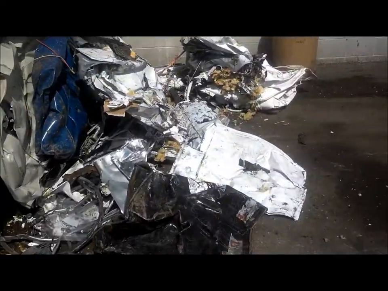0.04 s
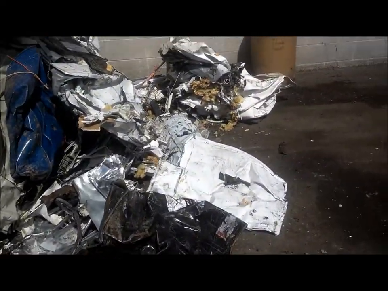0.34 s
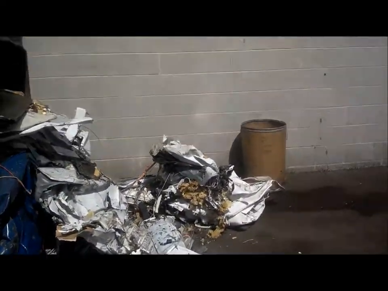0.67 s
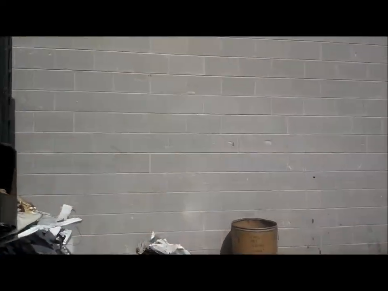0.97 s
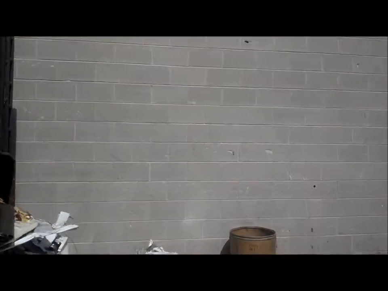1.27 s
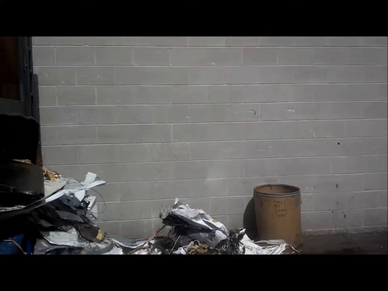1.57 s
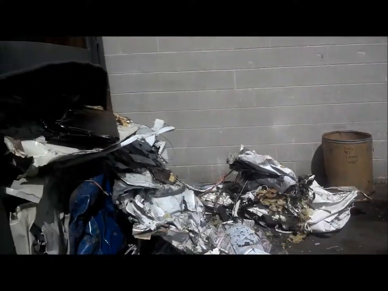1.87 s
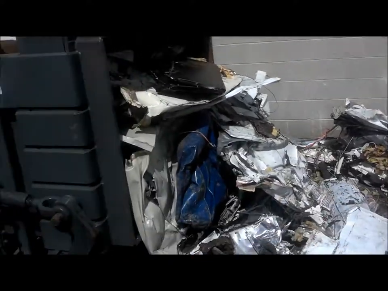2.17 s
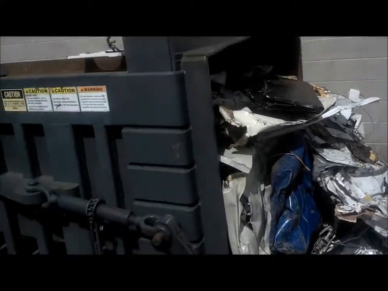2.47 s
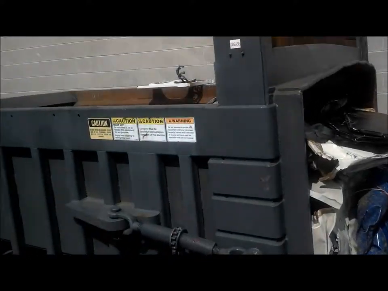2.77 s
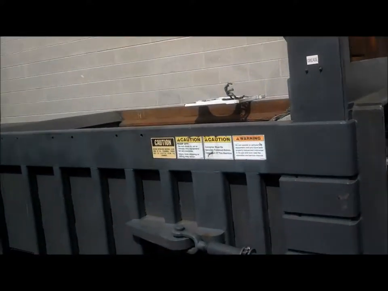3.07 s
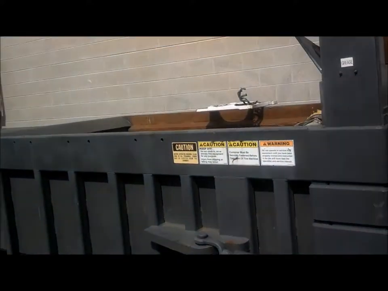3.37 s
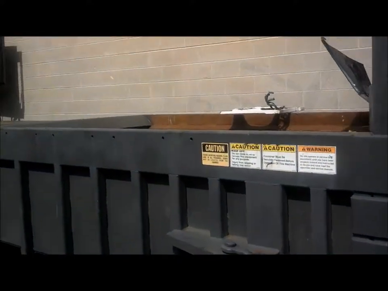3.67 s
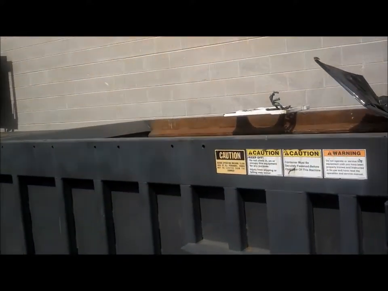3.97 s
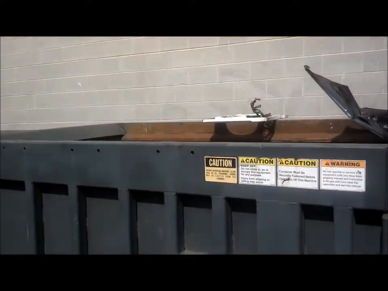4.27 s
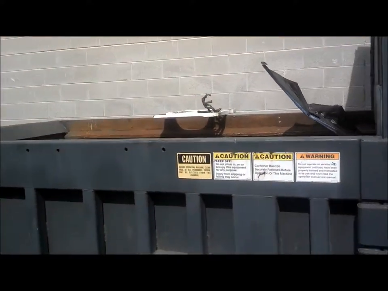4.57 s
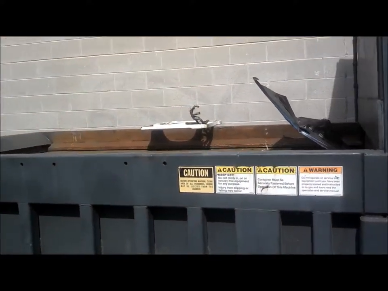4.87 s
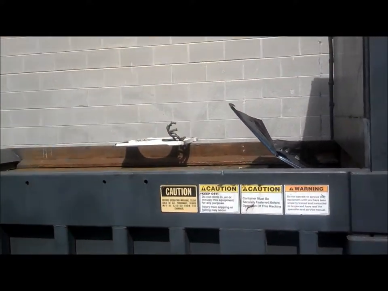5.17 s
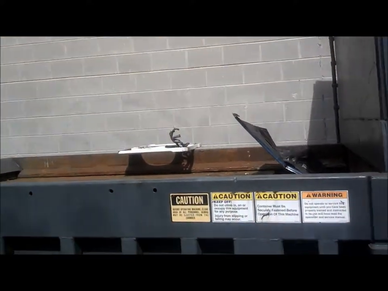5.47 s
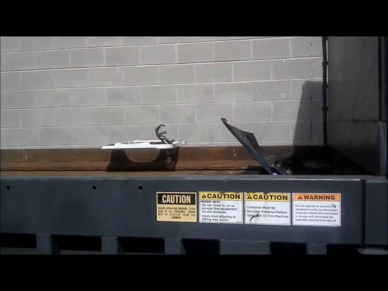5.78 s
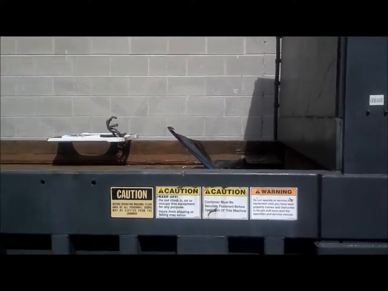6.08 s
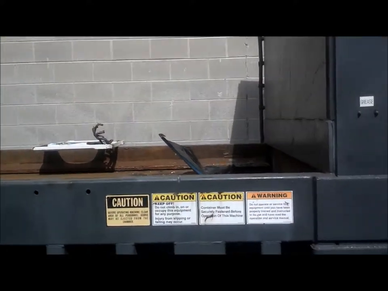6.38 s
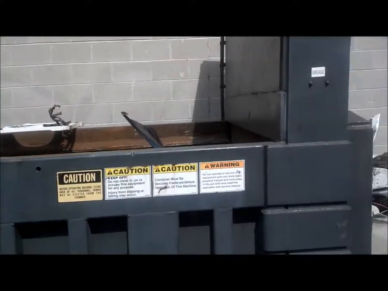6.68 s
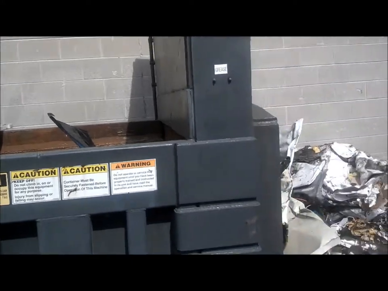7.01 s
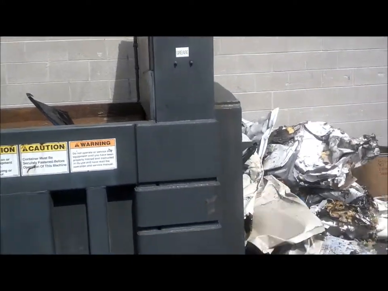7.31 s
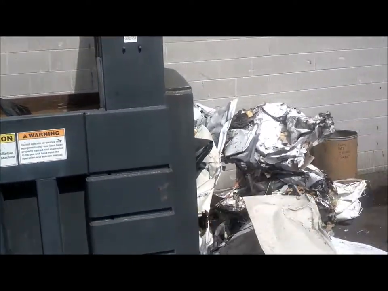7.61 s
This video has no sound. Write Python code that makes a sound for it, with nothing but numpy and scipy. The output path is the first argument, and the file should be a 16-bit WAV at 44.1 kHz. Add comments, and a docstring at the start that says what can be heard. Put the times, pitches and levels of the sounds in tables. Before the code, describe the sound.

A hydraulic compactor hums and whines while sheet metal scrap crunches, scrapes and snaps as it is pushed out.

```python
"""Hydraulic scrap compactor in a walled yard.

Sheet scrap buckles, scrapes and snaps as a ram pushes it out of a steel chamber.
A piston pump hums and whines over rushing oil and the rumbling body; this drone drops suddenly at
loud crunches and snaps, then swells back steadily. Heard through two close, moving microphone ports."""
import sys
import numpy as np
from scipy import signal
from scipy.fft import rfft, irfft, next_fast_len
from scipy.io import wavfile
from scipy.ndimage import uniform_filter1d, map_coordinates

SR = 44100
rng = np.random.default_rng(int(sys.argv[2]) if len(sys.argv) > 2 else 0)


def unload_audio(sound):
    """Save the sound as a 16-bit wav file, at the path given as the first command line argument."""
    columns = np.transpose(np.atleast_2d(sound))
    # keep every value between -1 and 1, then stretch to whole-number steps
    steps = np.round(np.clip(columns, -1, 1) * 32767)
    wavfile.write(sys.argv[1], SR, steps.astype(np.int16))


N = 346185
BURST_SAMPLES = 32768
BURST_HZ = np.fft.rfftfreq(BURST_SAMPLES, 1 / SR)

# load of shoving the bale, over easy running: time_s, strain_db
RAM_STRAIN = [(0, 12.5), (.3, 8), (.44, 4), (.6, 12.5), (.98, 8), (1.28, 14.5), (1.6, 2.5), (2.4, 1),
              (3.3, -0.5), (4.05, 1.5), (5.1, -1), (5.35, 0), (5.8, -5.5), (6.1, 4.5), (6.55, 0),
              (7.3, -0.5), (7.5, 2), (7.85, 3.5)]
# machine's bearing as bass balance: time_s, left_over_right_db
BEARING = [(0, 2), (.7, 5.5), (2.2, 7), (3.2, 0.5), (4.7, 0), (5.7, 1), (7.85, 0.5)]


def buckling():
    """Each fold thuds in the chamber, crunches at its piece's resonance and crackles at the edges."""
    # start_s, length_s, level_db, bright_db, weight_db, resonance_hz
    folds = [(0.0, 0.028, -22.5, 1, 7, 1010), (0.138, 0.03, -31.5, 3.5, 17, 700),
             (0.201, 0.096, -26, -3.5, 7.5, 603), (0.466, 0.044, -16.5, -5.5, -4, 710),
             (0.592, 0.018, -15, -15, -7, 746), (0.616, 0.036, -16, -2, 0, 726),
             (.773, 0.01, -14.5, -1.5, -17, 740), (0.784, 0.0059, -16.5, 2, -7, 700),
             (0.799, 0.092, -20, -2, -21, 805), (0.887, 0.063, -15, -6.5, -2, 670),
             (1.143, 0.013, -21, 0, 5, 700), (1.155, 0.041, -20.5, -1, 3.5, 875),
             (1.243, 0.09, -24, -9, -6, 695), (2.998, 0.0026, -14.5, -2.5, -3.5, 1900),
             (3.069, 0.021, -23.5, 3, -15, 2210), (3.694, 0.021, -19.5, 4.5, 2.5, 1730),
             (3.813, 0.084, -33, 1, 3, 796), (4.062, 0.016, -22.5, 9.5, -5, 790),
             (4.098, 0.013, -21, 6, -5, 680), (4.128, 0.014, -26, 7.5, 0, 1200),
             (4.177, 0.018, -25.5, 4.5, -7, 1000), (4.374, 0.015, -28, 13, 6, 796),
             (4.399, 0.074, -23.5, 4, -5, 670), (4.649, 0.014, -21.5, -9, -4, 1050),
             (4.698, 0.015, -29, -17, 10, 400), (5.214, 0.026, -23.5, 1.5, -4, 1190),
             (5.28, 0.056, -27.5, 0.5, 6, 1200), (5.373, 0.019, -25.5, -4, -2, 1090),
             (5.411, 0.027, -24, -9, 3, 550), (5.469, 0.06, -33, 1.5, -3, 1160),
             (5.577, 0.044, -27.5, 1.5, 6, 1500), (5.65, 0.067, -28, -16, -1, 850),
             (5.725, 0.023, -29, -13, 7, 900), (5.767, 0.018, -29, 2, -2, 800),
             (5.894, 0.023, -28.5, 2.5, 0, 880), (5.921, 0.01, -21.5, -7, 2, 700),
             (5.948, 0.013, -20, -1, 5, 1050), (5.976, .006, -26, -1, 0, 680),
             (6.071, 0.012, -31.5, 1, 3, 1290), (6.115, .007, -28, -8, 0, 1150),
             (6.152, 0.035, -34.5, -10, 13, 650), (6.664, 0.01, -26, -18, 5, 800),
             (6.764, 0.016, -32.5, -20, 4, 920), (6.82, 0.017, -30.5, -5, 1, 704),
             (6.968, 0.022, -31.5, -9, 11, 400), (7.089, 0.035, -31, -1.5, 7.5, 806),
             (7.162, 0.014, -31.5, -5, 11, 494), (7.293, .007, -24, -27, 7, 1100),
             (7.361, 0.012, -22, -0.5, -7, 1310), (7.382, 0.015, -19.5, -1.5, 3.5, 900),
             (7.417, 0.016, -22.5, 3, -13, 1300), (7.495, 0.014, -26.5, -2, -11, 910),
             (7.526, 0.0063, -25.5, -0.5, 9, 900), (7.621, 0.021, -22.5, -3, 0, 1400),
             (7.662, 0.0071, -24.5, 0, -10, 1400), (7.737, 0.048, -17.5, -2.5, 1.5, 1450),
             (7.75, 0.019, -25.5, -20, -10, 516), (7.803, 0.02, -19.5, 0, -5, 536)]
    # layer spectra: freq_hz, level_db
    thud_spectrum = [(25, -35), (60, -29), (100, -10), (160, 2.5), (330, 2.5), (520, 0), (900, -23.5),
                     (2500, -79.5)]
    crunch_spectrum = [(150, -51), (350, 3.5), (520, 3.5), (720, 2), (1050, 1), (1500, -0.5), (2000, -2.5),
                       (3000, -20), (7000, -63)]
    edge_spectrum = [(700, -47), (1500, -16), (2200, 6.5), (3300, 2.5), (4700, -2), (6000, -2), (7500, -13),
                     (10000, -13), (15500, -21)]
    thud, crunch, edge = map(minimum_phase, (thud_spectrum, crunch_spectrum, edge_spectrum))
    out = np.zeros((2, N))
    for start_s, length_s, level_db, bright_db, weight_db, centre_hz in folds + small_folds(count=16):
        body = 1 + amp(1.5) * resonance(BURST_HZ, centre_hz, width_hz=centre_hz / 1.8)
        layers = (weight_db - 8, thud), (0, crunch * body), (bright_db - 4, edge)
        force = stroke(length_s, rise_s=0.0007, t60_s=0.059 + 2.4 * length_s)
        run = cracks(force, rate_hz=2400, spread_db=2, ring_t60_s=0.034, ring_db=1.5, lead_gain=2.83)
        run *= sheet_modes(q=32, gain=0.71, count=9)
        add(out, start_s, sum(amp(level_db + db) * burst(run * colour, force) for db, colour in layers))
    return out


def small_folds(count):
    """Rows for faint folds at random times; their level follows the strain and the drone."""
    length_s, centre_hz, scatter_db = 0.013, 900, 3
    level_db = -30.5 + swell_db() + curves(RAM_STRAIN)[0] / 2
    return [(when * N / SR, length_s, level_db[int(when * N)] + scatter_db * (2 * size - 1),
             0, 0, centre_hz) for when, size in rng.random((count, 2))]


def scraping():
    """Sheets sliding on steel hiss with dense slips and rasp at their own resonance."""
    # start_s, length_s, rise_s, level_db, rasp_hz
    slides = [(0.84, 0.02, .01, -28.5, 4000), (1.022, 0.012, 0.0049, -31, 4300),
              (1.148, 0.052, 0.011, -27.5, 4200), (1.236, 0.049, .01, -37, 4200),
              (3.017, 0.027, 0.0067, -26.5, 2320), (3.185, 0.011, 0.0029, -26, 5900),
              (3.699, 0.052, 0.0028, -25, 14400), (3.795, 0.12, 0.014, -28, 6000),
              (4.167, 0.022, 0.0024, -27, 5950), (4.394, 0.045, 0.0034, -26, 5200),
              (6.515, 0.0069, 0.0011, -29, 3270), (6.536, 0.037, 0.002, -23, 1820),
              (6.548, 0.029, 0.0037, -23.5, 8100), (7.77, 0.057, 0.011, -33, 9500)]
    # freq_hz, level_db
    slide_spectrum = [(300, -16), (1000, -3.5), (1900, 0), (3500, 0.5), (5500, -3.5), (8000, -4.5),
                      (12000, -6.5), (15500, 3)]
    out, colour = np.zeros((2, N)), minimum_phase(slide_spectrum)
    for start_s, length_s, rise_s, level_db, rasp_hz in slides:
        force = stroke(length_s, rise_s, t60_s=0.14)
        rasp = 1 + amp(1) * resonance(BURST_HZ, rasp_hz, width_hz=rasp_hz / 3.5)
        slips = cracks(force, rate_hz=5000, spread_db=4, ring_t60_s=0.03, ring_db=4)
        add(out, start_s, amp(level_db) * burst(colour * rasp * slips, force))
    return out


def snapping():
    """Brittle pieces break: one bright crack, then milliseconds of splintering."""
    # start_s, length_s, level_db
    breaks = [(1.131, 0.005, -28), (2.033, 0.0025, -29), (2.996, 0.0016, -27.5), (3.076, .003, -30),
              (4.061, 0.0045, -21.5), (4.099, .003, -24), (4.33, 0.0019, -31), (4.371, .003, -34),
              (5.807, 0.0026, -21), (5.941, .003, -18), (6.517, .006, -22.5), (7.386, 0.0022, -19.5),
              (7.418, 0.0063, -17)]
    # freq_hz, level_db
    snap_spectrum = [(300, -30), (1000, -10), (2000, 7), (3500, -1.5), (6000, -1), (9000, -5),
                     (12000, -4.5), (15500, -0.5)]
    out, colour = np.zeros((2, N)), minimum_phase(snap_spectrum)
    for start_s, length_s, level_db in breaks:
        force = stroke(length_s, rise_s=0.0002, t60_s=0.02)
        snap = cracks(force, rate_hz=4000, spread_db=4, ring_t60_s=0.06, ring_db=-6, lead_gain=5)
        add(out, start_s, amp(level_db) * burst(colour * snap, force))
    return out


def squeak(start_s, pitch_hz, level_db):
    """An edge sticks and slips: a brief rough tone with its octave."""
    out = np.zeros((2, N))
    jitter = 0.035 * np.array([wobble(650, size=BURST_SAMPLES) for _ in range(2)])
    phase = 2 * np.pi * np.cumsum(pitch_hz * (1 + jitter), axis=1) / SR
    tone = unit(np.sin(phase) + 1.1 * np.sin(2 * phase))
    add(out, start_s, amp(level_db) * stroke(0.011, rise_s=0.0016, t60_s=0.16) * tone)
    return out


def ram_knocks():
    """The ram lurches against the box: quick, dull blows on thick steel."""
    # start_s, length_s, level_db
    knocks = [(2.13, 0.016, -22), (2.15, 0.022, -18), (2.181, 0.012, -23.5)]
    # centre_hz, width_hz, level_db
    steel_modes = [(122, 30, 0), (160, 35, 1), (208, 35, 1), (257, 40, 1), (387, 50, 0), (456, 45, -2),
                   (507, 45, -3), (612, 50, -3), (717, 60, -4), (940, 160, -13), (1615, 60, -12)]
    steel = sum((-1) ** k * amp(db) * resonance(BURST_HZ, centre_hz, width_hz)
                for k, (centre_hz, width_hz, db) in enumerate(steel_modes))
    out = np.zeros((2, N))
    for start_s, length_s, level_db in knocks:
        force = stroke(length_s, rise_s=0.0011, t60_s=0.11)
        grind = cracks(force, rate_hz=2000, spread_db=3, ring_t60_s=0.05, ring_db=-4, lead_gain=5)
        add(out, start_s, amp(level_db) * burst(steel * grind, force))
    return out


def pump():
    """Piston harmonics, fading in and out as the listener moves through standing waves."""
    # slows slightly under load: time_s, piston_hz
    piston_rate = [(0, 358), (1.4, 356.9), (2.1, 357.3), (2.3, 358.6), (3.2, 359), (4.8, 358.9),
                   (5.8, 358.9), (7.1, 359), (7.5, 357.4)]
    # time_s, hum_db, octave_db, fifth_harmonic_db, ninth_harmonic_db, whine_db
    standing_waves = [(0, -36, -30, -44, -42, -39), (1.1, -34, -24, -36, -39, -41),
                      (1.55, -36.5, -28, -32.5, -38, -36.5), (2.1, -34, -26.5, -34, -34, -36.5),
                      (2.25, -38, -43, -48, -50, -41), (2.55, -30.5, -36.5, -38, -46, -42),
                      (2.85, -35.5, -40, -37, -43, -39), (3.3, -36.5, -40, -48, -40.5, -37),
                      (3.67, -36, -41, -37, -39, -36), (3.9, -38, -39, -41.5, -43, -43),
                      (4.6, -41, -38.5, -39, -40.5, -35.5), (5.05, -32.5, -36.5, -35, -41, -33.5),
                      (5.42, -34, -38, -44, -40, -37), (5.65, -29, -36, -34.5, -45, -38),
                      (5.78, -37, -47, -39.5, -44, -41), (6.1, -37, -47, -39.5, -41, -40.5),
                      (6.5, -35, -53, -38.5, -39, -38), (7.85, -47, -58, -42, -54, -47)]
    # lesser pump overtones and thin valve overtones: harmonic, level_db
    whine_lines = [(3, -11), (4, -14), (6, -4), (7, -4), (8, -13), (10, -7), (11, -15), (12, -15),
                   (13, -11), (15, -11), (16, -19)]
    valve_lines = [(17, -17), (18, -17), (23, -16), (24, -11), (26, -14), (28, -11), (29, -9), (30, -7),
                   (32, -8), (33, -9), (34, -8), (35, -14), (36, -3), (37, -7), (38, -1), (39, -7),
                   (40, -7), (41, -5), (42, -8)]
    hum_db, octave_db, fifth_db, ninth_db, whine_db = curves(standing_waves)
    sheen_db = -41.5 + valve_db()
    phase = 2 * np.pi * np.cumsum(curves(piston_rate)[0] * (1 + 0.00016 * wobble(7))) / SR

    def line(harmonic, blur_rad):
        """One harmonic, roughened by uneven strokes."""
        gain = np.sqrt(2) * amp(1.5 * wobble(60))
        return gain * np.sin(harmonic * phase + rng.uniform(0, 2 * np.pi) + blur_rad * wobble(30))

    def stack(lines, blur_rad):
        return unit(sum(amp(db + 1.5 * wobble(4)) * line(harmonic, blur_rad) for harmonic, db in lines))

    hum = amp(hum_db + 1.4 * wobble(12)) * line(1, blur_rad=0.57)
    hum += amp(octave_db + 1.2 * wobble(12)) * line(2, blur_rad=0.4)
    mid, side = [amp(fifth_db) * line(5, blur_rad=0.45)
                 + amp(ninth_db) * line(9, blur_rad=0.3)
                 + amp(whine_db) * stack(whine_lines, blur_rad=0.4)
                 + amp(sheen_db) * stack(valve_lines, blur_rad=0.2) for _ in range(2)]
    return hum + np.array([mid + side, mid - side])


def body_and_oil():
    """The body rumbles, oil rushes and valves hiss; strain and bearing shift the balance."""
    # freq_hz, density_db
    rumble_spectrum = [(25, -39), (50, -42), (75, -18), (105, -6), (160, -2), (300, 4), (450, -11.5),
                       (800, -27), (2000, -63)]
    rush_spectrum = [(150, -31), (330, -4.5), (480, 0), (700, 1.5), (1000, -3.5), (1400, -3), (2000, -9.5),
                     (2600, -10.5), (3500, -15), (5000, -19.5), (8000, -28.5)]
    hiss_spectrum = [(700, -48), (2000, 19), (3400, 11), (5000, 4.5), (7000, 1), (10000, 4), (12500, 7),
                     (14500, 12), (16000, 5)]
    strain_db, = curves(RAM_STRAIN)
    aside_db, = curves(BEARING)
    rumble_db = -31.5 + 0.49 * strain_db + 0.59 * aside_db
    rumble = amp(rumble_db + 1.54 * wobble(22)) * panels(flow(rumble_spectrum, patchy_db=1.5))
    rush = amp(-27.5 + strain_db + 1.6 * wobble(45)) * panels(flow(rush_spectrum, patchy_db=1.5))
    hiss = amp(-29.5 + valve_db() + 1.6 * wobble(60)) * flow(hiss_spectrum, patchy_db=2.2)
    return rumble + rush + hiss


def valve_db():
    """Valve level: strain slows the oil, and beside the outlet the valves are screened."""
    return -0.18 * curves(RAM_STRAIN)[0] - 0.037 * curves(BEARING)[0]


def panels(noise):
    """Ribbed panels ring in narrow bands that come and go as the listener moves."""
    # centre_hz, width_hz, level_db
    panel_modes = [(163.4, 5, -2), (203, 6, -6), (286.6, 5, -10), (555, 12, -9), (640, 10, -7),
                   (755, 12, -7), (1190, 16, -6), (1320, 10, -11), (1560, 12, -10)]
    size, drift_db = next_fast_len(N), 2
    hz, spectrum = np.fft.rfftfreq(size, 1 / SR), rfft(noise, size)
    ringing = np.zeros((2, N))
    for modes in (panel_modes[::2], panel_modes[1::2]):
        response = sum(amp(db) * resonance(hz, centre_hz, width_hz) for centre_hz, width_hz, db in modes)
        ringing += amp(drift_db * wobble(1.86)) * irfft(spectrum * response, size)[:, :N]
    return unit(noise + ringing)


def box_boom(start_s, boom_db, t60_s, idle_db):
    """The box walls shudder in low modes: faintly with the pump, strongly after the ram lurches."""
    # centre_hz, width_hz, level_db
    wall_modes = [(77.6, 10, -26), (104, 22, 3), (150, 61, -2), (215, 33, 1.5)]
    size = next_fast_len(N)
    hz, age_s = np.fft.rfftfreq(size, 1 / SR), np.maximum(np.arange(N) / SR - start_s, 0)
    walls = sum(amp(db) * np.abs(resonance(hz, centre_hz, width_hz)) ** 2
                for centre_hz, width_hz, db in wall_modes)
    shudder = unit(irfft(rfft(rng.standard_normal((2, size))) * walls, size)[:, :N])
    lurch = amp(boom_db - 60 * age_s / t60_s) * (1 - np.exp(-age_s / 0.024))
    return (lurch + amp(idle_db)) * shudder


def swell_db():
    """Drone level: drops suddenly at the listed times of loud crunches and snaps, swells back steadily."""
    # start_s, depth_db
    sinks = [(-.1, 13), (.46, 13), (.89, 20.5), (1.13, 10), (2.15, 14), (3.005, 16), (3.71, 16.5),
             (4.06, 18.5), (5.799, 10), (5.94, 15.5), (6.52, 19.5), (7.4, 16)]
    sink_s, recovery_db_per_s = 0.03, 9.5
    t = np.arange(N) / SR
    dips_db = [np.clip((t - start_s) / sink_s, 0, 1) * (depth_db - recovery_db_per_s * (t - start_s))
               for start_s, depth_db in sinks]
    return -np.maximum(np.max(dips_db, axis=0), 0)


def yard(sound):
    """The block wall and steel chamber answer with a short tail."""
    # freq_hz, t60_s
    decay = [(100, 1), (1000, 0.9), (4000, 0.32), (15000, 0.087)]
    delay_s = 0.014
    hz, t, bins = signal.stft(rng.standard_normal((2, SR // 2)), SR, nperseg=256)
    tail = signal.istft(bins * amp(-60 * t / along(decay, hz)[:, None]), SR, nperseg=256)[1]
    tail = np.pad(tail / np.linalg.norm(tail[0]), ((0, 0), (round(delay_s * SR), 0)))
    return signal.fftconvolve(sound, tail, axes=1)[:, :N]


def stroke(length_s, rise_s, t60_s):
    """A force that builds, holds and dies away."""
    t = np.arange(BURST_SAMPLES) / SR
    return (1 - np.exp(-t / rise_s)) * amp(-60 * np.maximum(t - length_s, 0) / t60_s)


def cracks(force, rate_hz, spread_db, ring_t60_s, ring_db, lead_gain=0):
    """Spectrum of a run of tiny fractures, all ringing the same dense modes; lead_gain sizes the first."""
    size = BURST_SAMPLES
    t = np.arange(size) / SR
    strengths = rng.choice([-1, 1], size) * amp(spread_db * np.clip(rng.standard_normal(size), -2, 2))
    train = force * strengths * (rng.random(size) < rate_hz / SR)
    train[0] = lead_gain
    ring = rng.standard_normal((2, size)) * amp(-60 * t / ring_t60_s)
    click = rng.standard_normal((2, size)) * amp(-60 * t / 0.0058)
    return rfft(train) * rfft(unit(click) + amp(ring_db) * unit(ring))


def sheet_modes(q, gain, count):
    """Random resonances of one piece of scrap."""
    centres_hz = np.exp(rng.uniform(np.log(400), np.log(6000), count))
    return 1 + gain * sum(resonance(BURST_HZ, hz, hz / q) for hz in centres_hz)


def resonance(hz, centre_hz, width_hz):
    """Response of one damped mode."""
    return 1j * hz * width_hz / (centre_hz ** 2 - hz ** 2 + 1j * hz * width_hz)


def flow(spectrum, patchy_db):
    """Stereo noise, rms 1, with patches of random gain in time and frequency."""
    hz, _, bins = signal.stft(rng.standard_normal((2, N)), SR, nperseg=1024)
    patches = uniform_filter1d(rng.standard_normal(bins.shape[1:]), size=5, axis=0)
    patches = uniform_filter1d(patches, size=8, axis=1)
    gain = amp(along(spectrum, hz)[:, None] + patchy_db * unit(patches))
    return unit(signal.istft(bins * gain, nperseg=1024)[1][:, :N])


def minimum_phase(spectrum):
    """Causal response on BURST_HZ from (freq_hz, level_db) points."""
    cepstrum = irfft(np.log(amp(along(spectrum, BURST_HZ))))
    cepstrum[1:BURST_SAMPLES // 2] *= 2
    cepstrum[BURST_SAMPLES // 2 + 1:] = 0
    return np.exp(rfft(cepstrum))


def burst(spectrum, force):
    """Waveform of a spectrum, with the energy of its force."""
    return unit(irfft(spectrum)) * np.sqrt(np.mean(force ** 2))


def wobble(rate_hz, size=N):
    """Smooth random curve with knots at rate_hz."""
    knots = rng.standard_normal(int(size * rate_hz / SR) + 4)
    coarse = np.arange(0, size + 64, 64)
    return np.interp(np.arange(size), coarse, map_coordinates(knots, [coarse * rate_hz / SR]))


def curves(rows):
    """Per-sample values of each column after time_s."""
    time_s, *columns = np.transpose(rows)
    return [np.interp(np.arange(N) / SR, time_s, column) for column in columns]


def along(points, hz):
    """Interpolate (freq_hz, value) points on a log axis."""
    freq_hz, values = np.transpose(points)
    return np.interp(np.log(hz + 1), np.log(freq_hz + 1), values)


def amp(db):
    """Decibels to gain."""
    return 10 ** (np.asarray(db) / 20)


def unit(x):
    """Scale to rms 1."""
    return x / np.sqrt(np.mean(x ** 2) + 1e-20)


def add(track, start_s, sound):
    """Mix a sound in at start_s."""
    start = max(round(start_s * SR), 0)
    track[:, start:start + sound.shape[-1]] += sound[..., :N - start]


def scene():
    """Scrap and its reverberation over the machine's drone."""
    scrap = amp(-4.5) * buckling() + amp(1) * (scraping() + snapping())
    scrap += squeak(start_s=6.76, pitch_hz=5680, level_db=-31) + ram_knocks()
    reverb = amp(-10.5) * yard(scrap)
    drone = body_and_oil() + pump() + box_boom(start_s=2.18, boom_db=-20.5, t60_s=2.2, idle_db=-49)
    return scrap + reverb + amp(swell_db()) * drone


def record(dry):
    """Two close ports, widened by delay and subtraction: mid and side get interleaved combs."""
    # freq_hz, side_db
    stereo_width = [(40, 14), (100, -4), (330, -6), (600, -17.5), (1100, -4.5), (1800, 0)]
    # freq_hz, left_lead_rad
    phase_lead = [(80, 0.39), (350, 1.27), (500, 0.56), (750, 0.84), (1350, 0.76)]
    comb_hz, bass_hz, top_hz = 2765, 1150, 15780
    size = next_fast_len(N + SR // 2)
    hz = np.fft.rfftfreq(size, 1 / SR)
    left, right = rfft(dry, size)
    mid_gain = np.sin(np.pi * np.maximum(hz / comb_hz, 0.5))
    side_gain = np.cos(np.pi * hz / comb_hz) * amp(along(stereo_width, hz))
    norm = np.sqrt(2 * (mid_gain ** 2 + side_gain ** 2))
    mid, side = (left + right) * mid_gain / norm, (left - right) * side_gain / norm
    # bass is earlier and louder on the machine's side
    bass = 1 / (1 + (hz / bass_hz) ** 12)
    lead = np.exp(0.5j * along(phase_lead, hz) * bass)
    pair = np.array([(mid + side) * lead, (mid - side) / lead])
    pan = amp(np.array([[0.5], [-0.5]]) * curves(BEARING)[0])
    out = irfft(pair * bass, size)[:, :N] * pan + irfft(pair * (1 - bass), size)[:, :N]
    lowpass = 1 / np.sqrt(1 + (hz / top_hz) ** 600)
    return irfft(rfft(out, size) * lowpass, size)[:, :N]


dry = scene()
out = record(dry)
unload_audio(out)
```